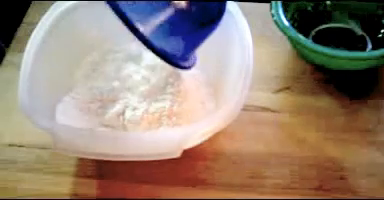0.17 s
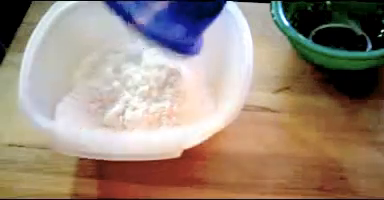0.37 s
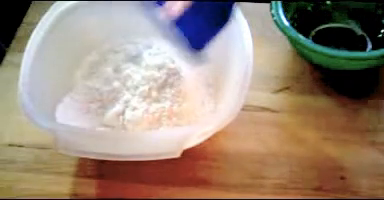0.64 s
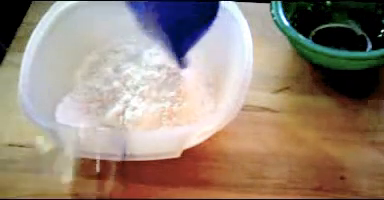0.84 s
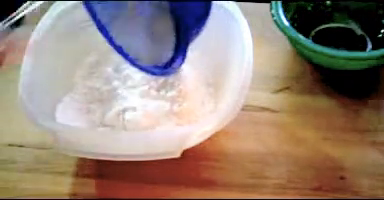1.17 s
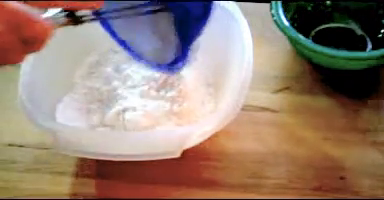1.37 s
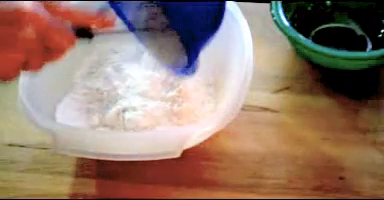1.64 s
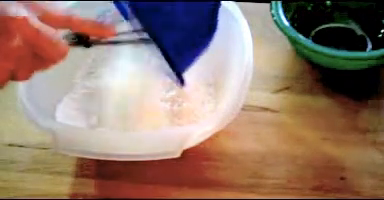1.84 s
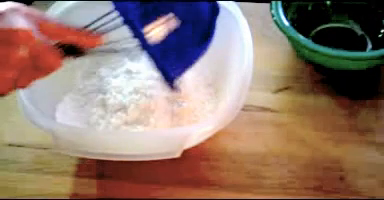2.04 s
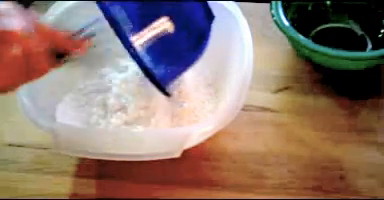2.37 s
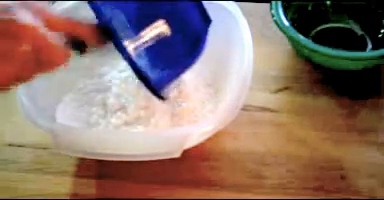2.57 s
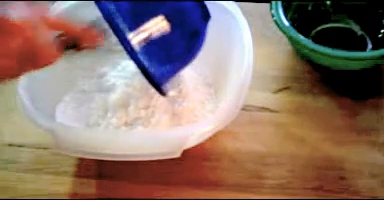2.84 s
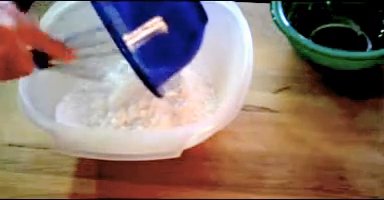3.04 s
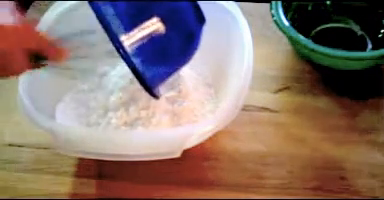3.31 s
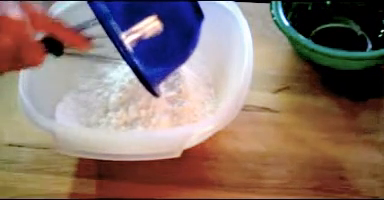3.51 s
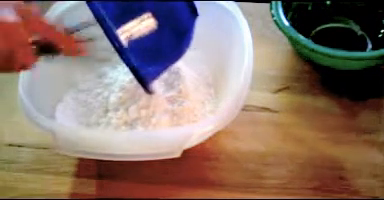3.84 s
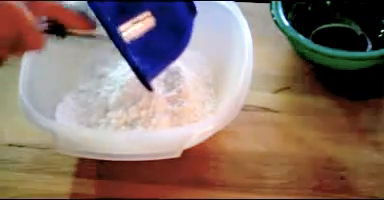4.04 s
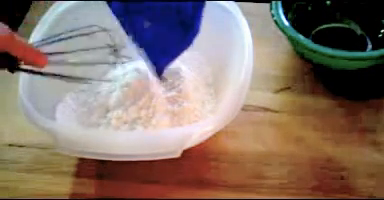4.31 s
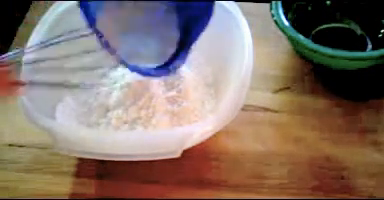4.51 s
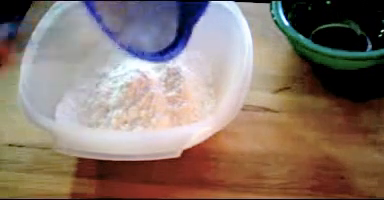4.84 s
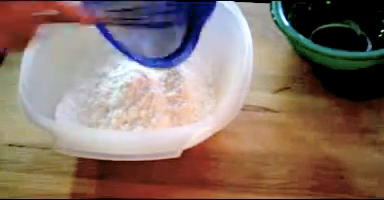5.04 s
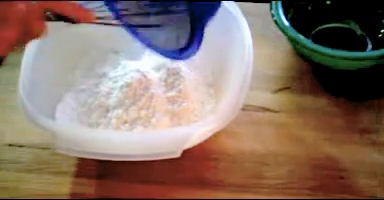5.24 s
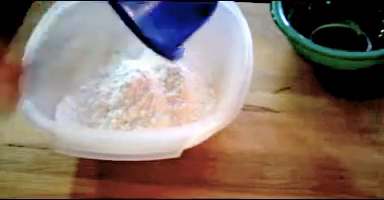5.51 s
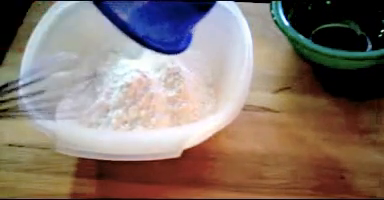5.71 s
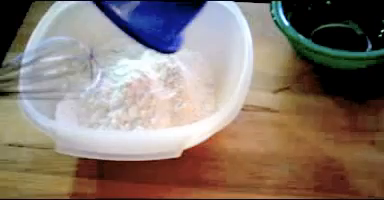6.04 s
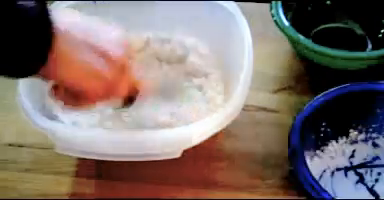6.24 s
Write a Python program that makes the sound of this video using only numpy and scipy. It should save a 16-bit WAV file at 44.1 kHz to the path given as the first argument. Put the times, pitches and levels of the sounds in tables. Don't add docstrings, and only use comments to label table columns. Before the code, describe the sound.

A small camera close to a kitchen table picks up low rumble, hiss and a thin high whine. A plastic bowl's faint hum fades at the start. A wire whisk hits a hard cup with one loud, bright clack, then lighter ringing taps about every third of a second, with dull knocks and faint flour hiss between. A far motor drones through the middle. Near the end, plastic bumps the bowl with a hollow clunk.

```python
import sys
import numpy as np
from scipy import signal
from scipy.fft import rfft, irfft
from scipy.io import wavfile
from scipy.ndimage import uniform_filter1d

SR = 44100
rng = np.random.default_rng(int(sys.argv[2]) if len(sys.argv) > 2 else 0)


def nominal_scale(level):
    x = np.asarray(level, float) / 20
    return 10 ** x


def bounce(signal):
    frames = np.transpose(np.atleast_2d(signal))
    limited = np.clip(frames, -1, 1)
    pcm = np.round(limited * 32767).astype(np.int16)
    wavfile.write(sys.argv[1], SR, pcm)


N = 281358
TIME = np.arange(N) / SR
HZ = np.fft.rfftfreq(N, 1 / SR)

# (frequency [Hz], level [dB per Hz])
FLOOR_COLOUR = [(3, -5), (16, 2), (33, -4), (107, -16), (153, -19.5), (313, -23.5), (1090, -31),
                (2200, -34.5), (4410, -39.5), (6770, -40.5), (9010, -37), (12000, -39), (13000, -42.5),
                (15400, -42)]
# (frequency [Hz], width [Hz], boost [dB])
FLOOR_RESONANCES = [(125, 18, 2), (6100, 170, 3.5), (10280, 180, -5.5), (10200, 300, 2)]
# (frequency [Hz], share [0-1])
SHARED_BY_PORTS = [(30, 1), (400, 0.99), (1700, 0.92), (4200, 0.65), (8000, 0.5), (10500, 0.3),
                   (14000, 0.8)]
PORT_OFFSET = [
    [.00333],
    [-.00115],
]

# (time [s], peak level [dB], centre [Hz])
FLOUR_SLIDES = [(0.2594, -60, 9930), (1.0445, -57, 9450), (1.0794, -60, 10000), (2.379, -56, 11400),
                (2.4994, -62, 8600), (2.5212, -57, 8730), (2.7594, -58, 9530), (2.9582, -60, 8680),
                (3.0694, -60, 9990), (4.1964, -44, 10600), (5.2244, -56, 8510), (5.2394, -65, 8370),
                (5.2904, -62, 9650), (5.3244, -59, 10500), (5.434, -56, 10600)]
# (time [s], peak level [dB], centre [Hz])
RIM_SKIMS = [
    (2.309, -52, 5800),
    (2.335, -56.5, 5800),
    (1.96, -57, 4700),
    (5.385, -52, 7700),
    (5.4, -52, 7700),
    (4.194, -50, 14000),
]
# (time [s], peak level [dB], centre [Hz])
RIM_FLICKS = [
    (1.4695, -49, 3650),
    (1.468, -55, 9000),
]

BOWL_HZ = [55, 290, 365, 410, 740, 960, 1045, 1075, 1150, 1556, 1771, 1904, 2030, 2010, 2140, 2256, 2290,
           2900, 4037, 4420, 5090]
# (level [dB], time to fall 60 dB [s])
BOWL_MODES = [(-11, 0.12), (-17, 0.058), (-7.5, 0.08), (-34, 0.034), (-30, 0.028), (-24, 0.039),
              (0.5, 0.056), (-14.5, 0.13), (-22, 0.014), (-21, 0.069), (-20, 0.045), (-17, 0.032),
              (2.5, 0.036), (-28, .11), (-19, .03), (1, 0.017), (-17.5, 0.12), (-24, 0.022), (-29, .03),
              (-15.5, 0.034), (-12, 0.024)]
# (time [s], peak level [dB], extra crack level [dB])
BOWL_BLOWS = [
    (5.7244, -19.5, 2),
    (5.733, -34, 8),
    (5.742, -39, 7),
]
# (frequency [Hz], level [dB], time to fall 60 dB [s])
BOWL_HUM = [(328, -61, 2.7), (363, -61, 1.4), (393, -57, 0.73), (482, -58, 0.35), (570, -61, 0.32),
            (1090, -73.5, 2.5)]

# (time [s], peak level [dB], centre [Hz], treble tick level [dB])
KNOCKS = [(0.226, -57, 1170, -62), (1.952, -48, 1074, -48), (1.972, -54, 780, -56),
          (2.304, -43.5, 1035, -48), (2.316, -53, 815, -51), (2.47, -58, 560, -72), (2.705, -56, 1030, -55),
          (4.145, -52.5, 1070, -62), (4.194, -53.5, 910, -54), (5.188, -49.5, 1080, -54),
          (5.26, -70, 900, -63), (5.312, -53.5, 1480, -50)]
# (ratio to centre [-], level [dB], time to fall 60 dB [s])
HOLLOW_MODES = [(.5, -10.5, 0.019), (.62, -1.5, 0.031), (.74, -17, 0.047), (.87, -3, 0.036), (1.0, 5, .022),
                (1.17, -4, 0.026), (1.6, -11.5, 0.013)]

CUP_HZ = [900, 1062, 1115, 1300, 1870, 2300, 2700, 2762, 2775, 3300, 3700, 4450, 5055, 5090, 5243, 5450,
          5800, 7671, 7747, 8253, 8909, 9180, 9442, 10340, 10690, 11080, 12790, 13670, 14970]
# (level [dB], time to fall 60 dB [s]); close pairs beat, a hand damps some
CUP_MODES = [(-19, 0.043), (1.5, 0.19), (2.5, 0.08), (-33, 0.047), (-8, 0.035), (-52, 0.017), (-5.5, 0.057),
             (3, 0.054), (-9.5, 0.097), (-7.5, 0.043), (-8, 0.031), (-3, 0.015), (7.5, 0.039), (-20, 0.25),
             (-18, 0.037), (-14, 0.03), (-13, 0.021), (-5, 0.085), (12, 0.014), (1, 0.027), (-5, 0.075),
             (-30, 0.024), (0.5, 0.064), (-6, 0.057), (-0.5, 0.065), (-32, .05), (5, 0.038), (-3, 0.03),
             (-1, 0.028)]
FAMILY_EDGES_HZ = [1600, 3500, 6500]
# (frequency [Hz], level [dB])
CRACK_COLOUR = [(300, -6), (700, -1), (1500, -7.5), (2300, -3.5), (3700, -4.5), (5000, -2), (6500, -6.5),
                (9000, -2), (12000, 0), (16500, -2)]
# (time [s], crack peak [dB], ring level [dB], family struck best [0-3], spread [families])
TAPS = [(0.6826, -55, -49.5, 0.93, 1.07), (0.6994, -44, -64, 1.2, 3.5), (1.3276, -13, -29, 1.1, 4.9),
        (1.341, -24, -39, 2.2, 0.8), (1.3655, -30, -43.5, 1.34, 1.4), (1.79, -54, -63, 2.2, 1.1),
        (2.0862, -41, -65, 1.6, 3.5), (2.0964, -49, -56, 2.3, 1.3), (2.4794, -43, -64, 2.4, 1.6),
        (2.712, -46, -57, 2.2, 1.3), (3.021, -43, -61, 0.087, 1.5), (3.3051, -32.5, -50.5, 1.73, 1),
        (3.3144, -38, -60, 1.4, 1.3), (3.6058, -27, -38, 1.88, 0.97), (3.9103, -24, -40.5, 1.65, 0.99),
        (3.9237, -27.5, -39, 2.14, 0.66), (3.9594, -45, -70, 2.5, 1.8), (4.1959, -31.5, -48, 2.1, 0.95),
        (4.2098, -50, -64, 1.5, 3.1), (4.283, -41, -55, 1.4, 1.3), (5.3128, -53.5, -42, 1.18, 0.46)]
# (time [s], ring level [dB])
REBOUNDS = [
    (2.8025, -60),
    (3.1094, -58.5),
    (3.399, -57),
    (3.676, -53.5),
    (3.9938, -56),
]
# (time [s], frequency [Hz], level [dB], time to fall 60 dB [s])
LOOSE_GRIP = [
    (1.33, 2772, -46.5, 0.29),
    (1.335, 5090, -48, 0.28),
    (1.34, 10690, -59, 0.27),
    (3.112, 2772, -62, 0.2),
    (3.308, 2772, -59.5, 0.33),
    (3.61, 2772, -52, 0.3),
    (3.933, 2772, -61, 0.2),
    (5.316, 2772, -58, 0.2),
]


def spectrum(points, hz):
    at, value = np.transpose(points)
    return np.interp(np.log(hz + 1), np.log(at), value)


def hump(hz, centre_hz, sharp, power=4):
    return 1 / (1 + (sharp * np.log(hz / centre_hz)) ** power)


def noise(gain, size):
    x = irfft(rfft(rng.standard_normal(size)) * gain, size)
    return x / x.std()


def burst(gain, t, t60):
    return noise(gain, len(t)) * nominal_scale(-60 * t / t60) * (1 - np.exp(-t / 0.00079))


def ring(modes, db, t, rise_s, scatter_db, rough):
    hz, _, t60 = np.transpose(modes)[:, :, None]
    chance = rng.standard_normal((3, len(modes), 1))
    chatter = np.repeat(rng.standard_normal((len(modes), len(t) // 128)), 128, axis=1)
    chatter = uniform_filter1d(chatter, size=128, axis=1)
    shake = 1 + rough * chatter * (1 - np.exp(-t / 0.0087))
    sines = np.sin(2 * np.pi * hz * (1 + 0.0029 * chance[0]) * t + 0.83 * chance[1])
    fading = nominal_scale(db[:, None] + scatter_db * chance[2] - 60 * t / t60)
    body = np.sum(fading * shake * sines, axis=0)
    return body * (1 - np.exp(-t / rise_s))


def add(out, s, sound):
    i = int(s * SR)
    out[i:i + len(sound)] += sound[:len(out) - i]


def floor():
    floor_db, top_hz = -59.5, 15250
    db = spectrum(FLOOR_COLOUR, HZ)
    for centre_hz, width_hz, boost_db in FLOOR_RESONANCES:
        db = db + boost_db * np.exp(-((HZ - centre_hz) / width_hz) ** 2)
    alike = np.clip(spectrum(SHARED_BY_PORTS, HZ), 0, 1)
    band = (HZ > 100) & (HZ < 6000)
    gain = nominal_scale(db + floor_db) / np.sqrt(2 * np.sum(nominal_scale(db[band]) ** 2) / N)
    hiss = rfft(rng.standard_normal((3, N))) * gain * (HZ < top_hz)
    shared = irfft(hiss[0] * np.sqrt(alike), N)
    own = irfft(hiss[1:] * np.sqrt(1 - alike), N)
    return shared, own


def whine():
    whine_hz, whine_db = 7867.2, -66.5
    waver = 1 + 0.11 * noise(1 / (1 + (HZ / 30) ** 2), N)
    return nominal_scale(whine_db) * np.sqrt(2) * waver * np.sin(2 * np.pi * whine_hz * TIME)


def drone():
    drone_hz, drone_db, octave_db = 179.2, -68, -68.5
    on_s, off_s, fade_s, octave_wide_s = 1.28, 3.3, 0.25, 0.086
    load_s, load_wide_s, load_db = 2.23, 0.26, 5.5

    def bump(s, wide_s):
        return np.exp(-((TIME - s) / wide_s) ** 2)

    running = np.clip(np.minimum(TIME - on_s, off_s - TIME) / fade_s + 1, 0, 1)
    wander = noise(1 / (1 + (HZ / 4.07) ** 2), N)
    phase = 2 * np.pi * np.cumsum(drone_hz + 1.79 * wander) / SR
    first = running * nominal_scale(drone_db + load_db * bump(load_s, load_wide_s))
    octave = nominal_scale(octave_db) * (bump(on_s, octave_wide_s) + bump(off_s, octave_wide_s))
    return np.sqrt(2) * (first * np.sin(phase) + octave * np.sin(2 * phase))


def flour():
    sift_per_s, sift_db, sift_scatter_db, sift_hz = 7, -61, 2.5, 9700
    out, t = np.zeros(N), TIME[:2048]
    hz = np.fft.rfftfreq(len(t), 1 / SR) + 1
    swell = t / 0.0043 * np.exp(1 - t / 0.0039)
    sift = []
    for k in range(int(sift_per_s * N / SR)):
        when, loud, pitch = rng.random(3)
        sift_level = sift_db + sift_scatter_db * (2 * loud - 1)
        sift.append(((k + when) / sift_per_s, sift_level, sift_hz * (1 + 0.08 * (pitch - 0.5))))
    for patches, sharp in ((FLOUR_SLIDES + sift, 9.5), (RIM_SKIMS, 22)):
        for s, db, centre_hz in patches:
            add(out, s, nominal_scale(db - 5.5) * swell * noise(hump(hz, centre_hz, sharp), len(t)))
    for s, db, centre_hz in RIM_FLICKS:
        add(out, s, nominal_scale(db) * burst(hump(hz, centre_hz, 6.5, power=2), t, 0.02))
    return out


def bowl():
    out, t = np.zeros(N), TIME[:6144]
    hz = np.fft.rfftfreq(len(t), 1 / SR) + 1
    modes = np.column_stack([BOWL_HZ, BOWL_MODES])
    for s, db, bright_db in BOWL_BLOWS:
        add(out, s, ring(modes, modes[:, 1] + db - 6.0, t, 0.00064, 2.6, rough=1.0))
        add(out, s, nominal_scale(db + bright_db - 13) * burst(1 / (1 + (hz / 4000) ** 1.8), t, 0.031))
        add(out, s, nominal_scale(db - 29) * burst(hump(hz, 1700, 2.4), t, 0.23))
    hum_db = np.array(BOWL_HUM)[:, 1]
    add(out, 0, ring(BOWL_HUM, hum_db, TIME[:16384], 0.0044, 0, rough=0.92))
    return out


def knocks():
    out, t = np.zeros(N), TIME[:4096]
    hz = np.fft.rfftfreq(len(t), 1 / SR) + 1
    hollow_db = np.array(HOLLOW_MODES)[:, 1]
    for s, db, centre_hz, tick_db in KNOCKS:
        modes = [(centre_hz * ratio, gain_db, t60) for ratio, gain_db, t60 in HOLLOW_MODES]
        add(out, s, ring(modes, hollow_db + db, t, 0.00013, 1.3, rough=0.83))
        add(out, s, nominal_scale(db - 7.5) * burst(hump(hz, 0.81 * centre_hz, 3.4), t, 0.14))
        add(out, s, nominal_scale(db - 7.5) * burst(hump(hz, 320, 2.6), t, 0.096))
        add(out, s, nominal_scale(tick_db) * burst(hump(hz, 5500, 1.3), t, 0.038))
    return out


def whisk():
    fall_db, deepest_db = 9, 19
    out, t = np.zeros(N), TIME[:6144]
    hz = np.fft.rfftfreq(len(t), 1 / SR)
    family = np.searchsorted(FAMILY_EDGES_HZ, CUP_HZ)
    mode_db, t60 = np.transpose(CUP_MODES)
    modes = np.transpose([CUP_HZ, mode_db, t60])
    lasting = t60 > 0.12
    mode_treble = np.clip(np.array(CUP_HZ) / 11500 - 1, 0, 1)
    crack_treble = np.clip(hz / 11500 - 1, 0, 1)
    rebounds = [(s, db + 12, db, 1.66, 1.4) for s, db in REBOUNDS]
    for s, crack_db, ring_db, struck, spread in TAPS + rebounds:
        db = mode_db + ring_db - np.minimum(fall_db * ((family - struck) / spread) ** 2, deepest_db)
        db -= lasting * 0.68 * max(crack_db + 32.5, 0)
        soft_db = 2.1 * np.clip(-21.5 - crack_db, 0, 14)
        db -= soft_db * mode_treble * 4
        colour = nominal_scale(spectrum(CRACK_COLOUR, hz) - soft_db * crack_treble * 9)
        rise_s = 0.0006 * nominal_scale(np.clip(-0.8 * (crack_db + 30.5), 0, 16))
        crack = nominal_scale(crack_db - 16.5) * burst(colour, t, 0.053)
        add(out, s, ring(modes, db, t, rise_s, 1.5, rough=0.5) + crack)
    for s, sing_hz, db, t60_s in LOOSE_GRIP:
        add(out, s, ring([(sing_hz, db, t60_s)], np.array([db]), TIME[:12288], 0.008, 0, rough=0.7))
    return out


def kitchen(work):
    room_t60_s, room_db = 0.45, -27
    t = TIME[:22050]
    tails = rng.standard_normal((2, len(t))) * nominal_scale(-60 * t / room_t60_s) * (t > 0.004)
    tails = signal.lfilter([1], [1, -0.3], tails)
    tails = tails / np.sqrt(np.sum(tails ** 2) / 2)
    return nominal_scale(room_db) * signal.fftconvolve(work[None], tails, axes=1)[:, :N]


def scene():
    left_lag_samples = 0.91
    shared, own = floor()
    work = bowl() + knocks() + whisk()
    right = shared + whine() + drone() + flour() + work
    left = irfft(rfft(right) * np.exp(-2j * np.pi * HZ * left_lag_samples / SR), N)
    return np.array([left, right]) + own + kitchen(work)


def top_cut(x):
    return signal.sosfilt(signal.butter(12, 16690, fs=SR, output="sos"), x)


def record(dry):
    cut = signal.sosfilt(signal.cheby1(8, 1, 15500, fs=SR, output="sos"), dry)
    return top_cut(cut + np.array(PORT_OFFSET))


dry = scene()
out = record(dry)
bounce(out)
```